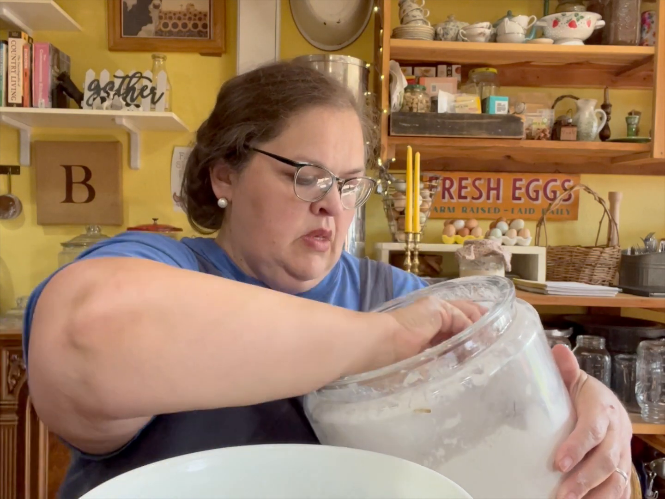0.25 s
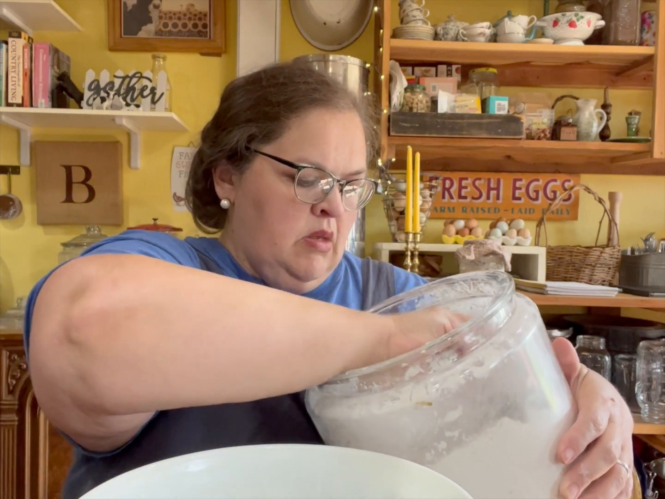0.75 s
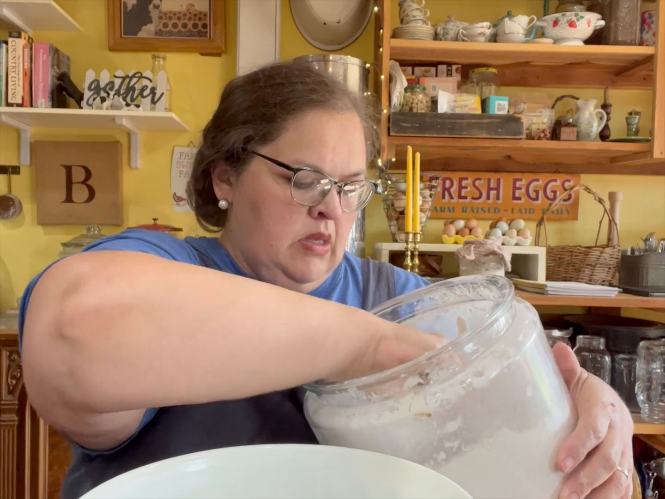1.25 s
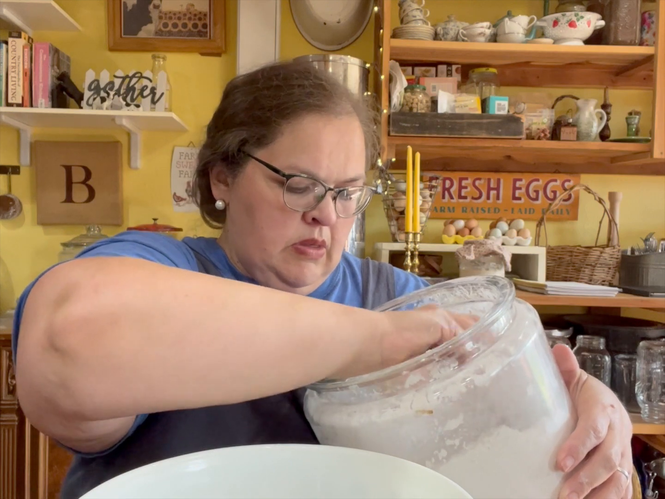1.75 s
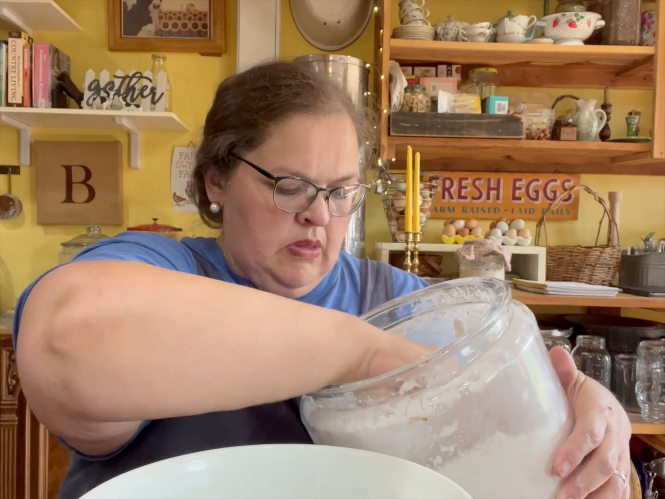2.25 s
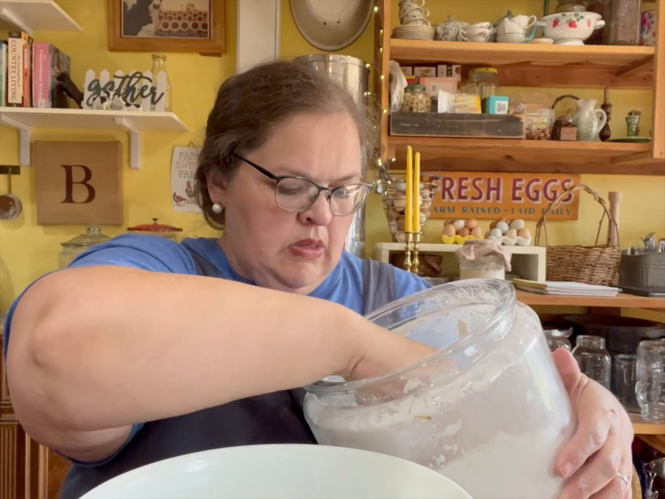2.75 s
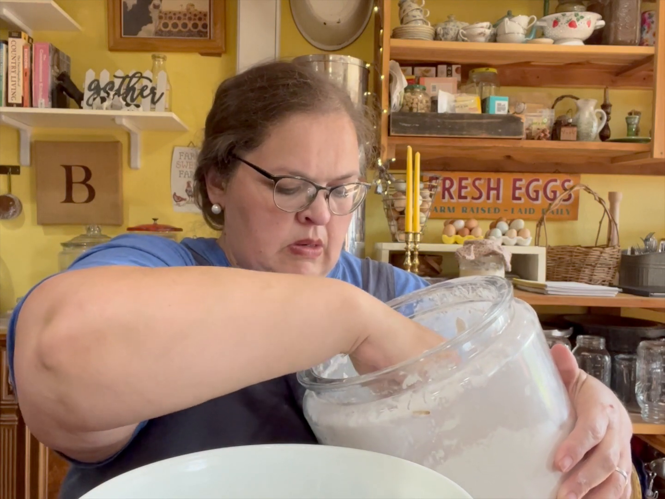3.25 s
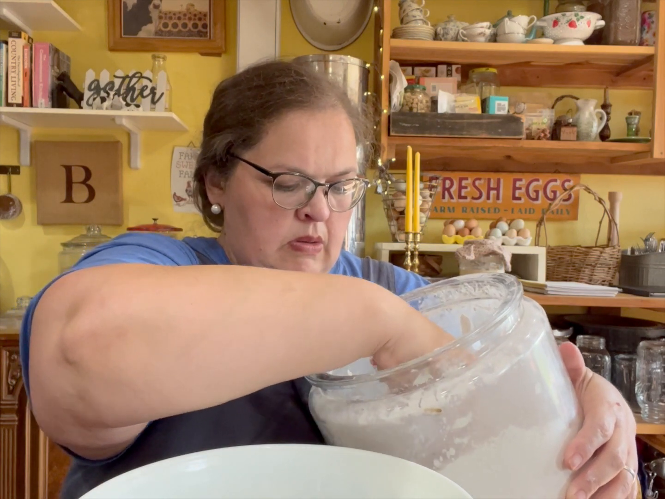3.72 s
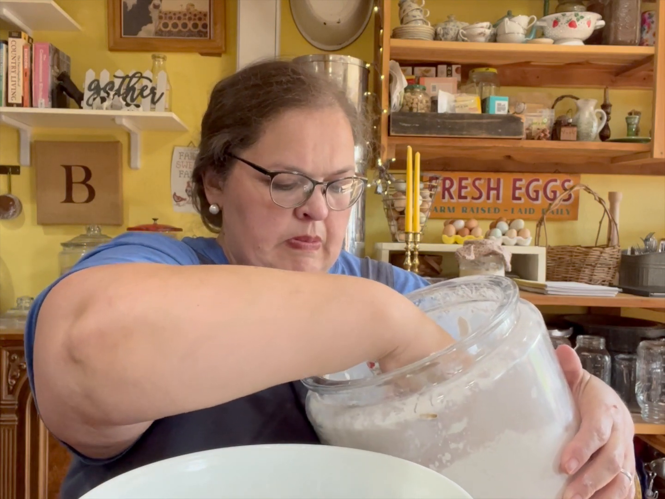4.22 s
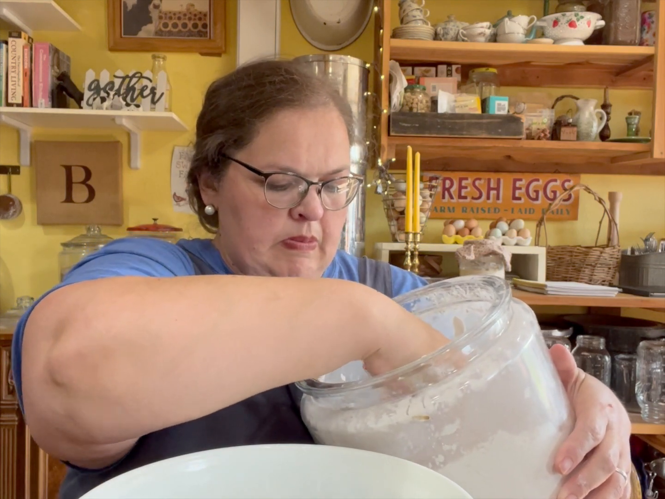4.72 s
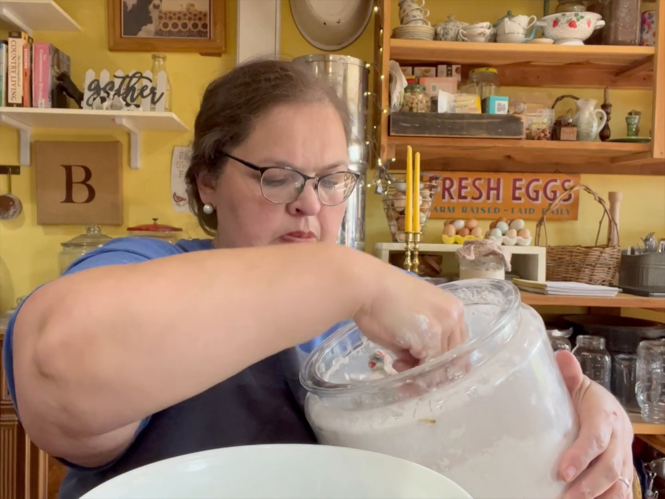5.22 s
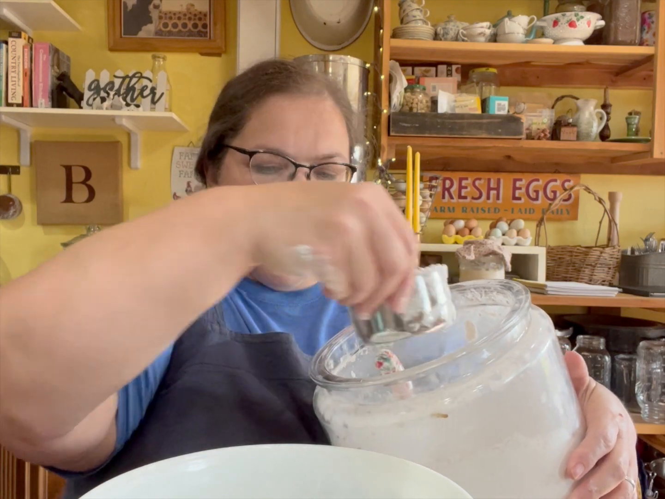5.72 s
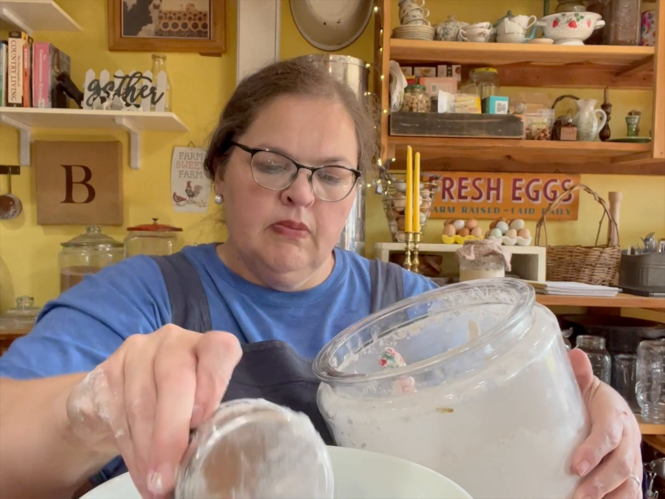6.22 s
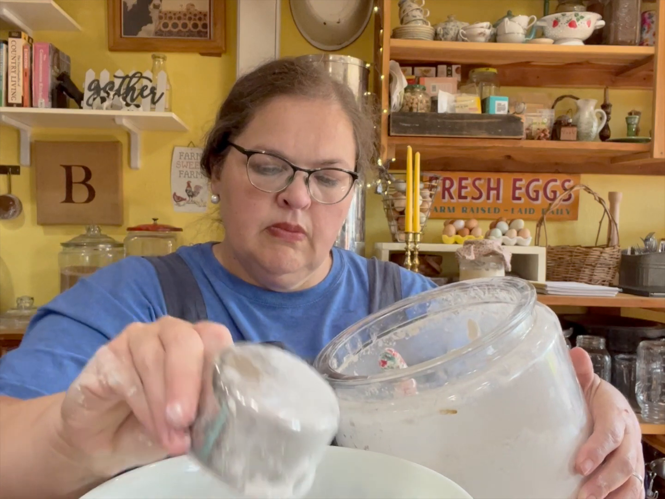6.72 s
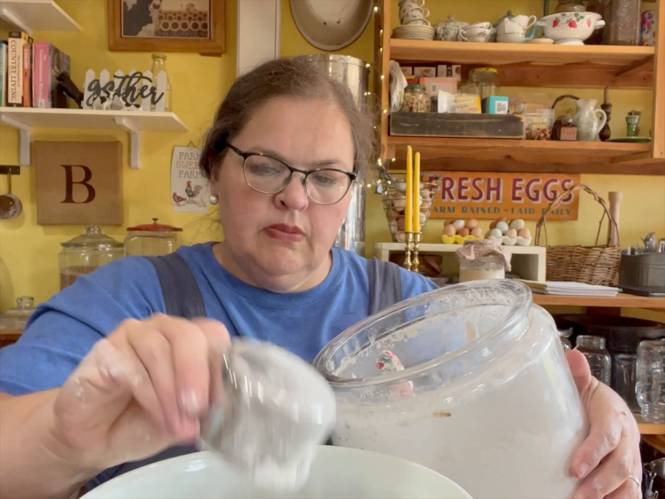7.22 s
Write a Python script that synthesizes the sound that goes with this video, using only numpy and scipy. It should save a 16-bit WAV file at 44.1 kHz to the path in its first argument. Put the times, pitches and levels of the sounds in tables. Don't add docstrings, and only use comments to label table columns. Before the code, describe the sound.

A small glass cup knocks and rings inside a big glass jar of flour, soft scrapes, then a load lands in a bowl over fridge hum.

```python
import sys
import numpy as np
from scipy import signal
from scipy.fft import rfft, irfft
from scipy.io import wavfile
from scipy.ndimage import uniform_filter1d

SR = 44100
rng = np.random.default_rng(int(sys.argv[2]) if len(sys.argv) > 2 else 0)


def bounce(signal):
    frames = np.transpose(np.atleast_2d(signal))
    limited = np.clip(frames, -1, 1)
    pcm = np.round(limited * 32767).astype(np.int16)
    wavfile.write(sys.argv[1], SR, pcm)


def invert_db(x):
    u = np.asarray(x, float) / 20
    return 10 ** u


N = 329427

# frequency [Hz], level [dB per Hz].
RUSH_SUM = [(28, -25), (45, -10), (85, -3.5), (155, -3.5), (240, -6), (350, -9.5), (550, -17), (900, -20),
            (1600, -26.5), (2600, -30), (4200, -38.5), (8000, -45.5), (10500, -53), (15000, -58.5)]
# frequency [Hz], level [dB per Hz].
RUSH_DIFFERENCE = [(28, -41), (45, -16.5), (85, -18), (155, -18.5), (240, -9.5), (350, -16.5), (550, -15),
                   (900, -17.5), (1600, -26), (2600, -29.5), (4200, -39), (8000, -44.5), (10500, -56),
                   (15000, -67)]
# peak [s], hiss [dB], dying time [s].
SLIDE_STROKES = [(.05, -79, 0.58), (.4, -78, 0.65), (.62, -73.5, 0.32), (.888, -68.5, 0.11),
                 (1.15, -72, 0.67), (1.52, -78, .5), (1.87, -72.5, 0.17), (2.04, -74.5, 0.19),
                 (2.185, -74, 0.15), (2.52, -75.5, 0.18), (2.73, -69.5, 0.077), (2.9, -74.5, 0.21),
                 (3.44, -79, .3), (4.2, -79, .6), (5.243, -74.5, .06), (5.52, -85, 0.98),
                 (5.865, -61.5, 0.071), (5.925, -61, .12), (6.1, -71.5, 0.092), (6.24, -64.5, 0.067),
                 (6.28, -61.5, 0.067), (6.308, -53.5, 0.043), (6.7, -80, 0.27), (7.07, -77, 0.12),
                 (7.24, -76.5, .25), (7.42, -76.5, .12)]
# frequency [Hz], level [dB per Hz].
SLIDE_COLOUR = [(2500, -18), (5000, -8.5), (7400, -8.5), (8500, 3.3), (9500, -5.5), (13000, -3),
                (15500, -8.5)]
# start [s], glass ring [dB], jar-air thud [dB], tick [dB], tick top [Hz].
RINGING_KNOCKS = [
    (0.130, -12, -24.5, -25, 1740),
    (0.632, -11.5, -25, -44, 1045),
    (1.0423, -0.5, -17.5, -14, 2380),
    (1.272, -23, -25.5, -22.5, 5100),
    (1.644, -29, -24, -29, 4440),
    (1.795, -9, -28.5, -33, 2080),
]
# start [s], jar-air thud [dB], tick [dB], tick top [Hz].
LIGHT_TAPS = [
    (0.88, -49, -38.5, 3970),
    (0.896, -45, -46, 3000),
    (2.722, -70, -49, 15660),
    (6.304, -66, -43.5, 13400),
    (6.614, -43, -37.5, 652),
]
# start [s], jar-air thud [dB].
DEEP_BUMPS = [
    (0.31, -40),
    (1.98, -31),
    (4.121, -33.5),
    (4.222, -35.5),
]
MODE_HZ = [566, 766, 802, 829, 884, 926, 1056, 1200, 1267, 1368, 1488, 1778, 1890, 2293, 2417, 2427, 2861,
           3384, 4612, 5006, 6092, 6444, 7736, 8110, 8480]
# level [dB], t60 [s], left minus right [dB].
MODE_RING = [(-34, 0.12, 8), (-33, 0.38, -11), (-30.5, 0.22, 16.5), (-25, 0.24, -15), (-44, 0.17, -10),
             (-42.5, 0.36, 3.5), (-31, 0.11, 8.5), (-40.5, 0.39, 1), (-30.5, 0.12, 18),
             (-36.5, 0.23, -24.5), (-62.5, 0.21, -19), (-41, 0.3, -13), (-42, 0.2, -4), (-39, 0.2, -13),
             (-27, 0.25, -1), (-40.5, 0.69, 3), (-35, 0.13, 12.5), (-44, 0.36, -5.5), (-49, 0.3, -14),
             (-55, 0.32, -14.5), (-36.5, 0.13, -9.5), (-67, 0.6, -22), (-49, 0.082, 3.5), (-50, .12, 0),
             (-48, 0.14, -15)]
# frequency [Hz], t60 [s].
ECHO_T60 = [(300, 0.2), (1500, 0.44), (4200, 0.47), (9000, 0.14)]
# frequency [Hz], echo level [dB].
ECHO_LEVEL = [(300, -26), (1000, 1), (2500, 2.5), (4500, 2.5), (7000, -25.5), (14000, -14.5)]
# peak [s], patter [dB], dying time [s].
FLOUR_FALLS = [
    (.895, -54.5, 0.13),
    (6.31, -52.5, 0.085),
    (6.5, -54, 0.15),
    (6.6, -60, 0.098),
]
# frequency [Hz], level [dB per Hz].
FALL_COLOUR = [(500, -7.5), (1200, -0.5), (1700, -1.5), (2500, -4.5), (3500, -15), (6000, -21),
               (9000, -21.5)]
# frequency [Hz], gain [dB].
SPACED_SUM = [(7000, -0.26), (9000, -6), (10000, -17.5), (12000, -12.5), (13300, -7.5), (14150, -2),
              (14700, -4), (15500, -0.7)]

STILL_DB = -90
BARE_FROM_DB = -3


def at_hz(points, hz):
    point_hz, value = np.array(points).T
    return np.interp(np.log(hz + 1), np.log(point_hz), value)


def left_right(mid, side):
    return np.array([mid + side, mid - side])


def coloured(spectrum):
    white = rfft(rng.standard_normal(N))
    return irfft(white * invert_db(at_hz(spectrum, np.fft.rfftfreq(N, 1 / SR))), N)


def house_rush():
    return invert_db(-24.5) * left_right(coloured(RUSH_SUM), coloured(RUSH_DIFFERENCE))


def drift(rate_hz):
    points_per_s = 40
    steps = rng.standard_normal(int(N / SR * points_per_s) + 2)
    r = np.exp(-2 * np.pi * rate_hz / points_per_s)
    slow = signal.lfilter([1], [1, -r], steps)
    return np.interp(np.arange(N) / SR * points_per_s, np.arange(len(slow)), slow / slow.std())


def fridge():
    motor_hz, motor_db, motor_pan_db, fade_in_s = 59.2, -51.5, 2.2, 0.17
    second_db, beat_s, loudest_s = -7.5, 4.65, 2.77
    whine_hz, whine_db, whine_pan_db, whine_lag_s = 268.68, -40.5, 5.5, .0001
    t, side = np.arange(N) / SR, np.array([[.5], [-.5]])
    second = invert_db(second_db) * np.exp(2j * np.pi * (t - loudest_s) / beat_s)
    beat = np.abs(1 + second) * np.minimum(t / fade_in_s, 1)
    motor_turn = 2 * np.pi * motor_hz * t + 0.25 * drift(1.0)
    motor = beat * invert_db(motor_db + motor_pan_db * side) * np.sin(motor_turn)
    whine_turn = 2 * np.pi * whine_hz * (t - whine_lag_s * side) + 0.15 * drift(0.98)
    whine = invert_db(whine_db + whine_pan_db * side + 0.92 * drift(2.7)) * np.sin(whine_turn)
    return np.sqrt(2) * (motor + whine)


def in_time(rows):
    rise_share, rest_db, dies_db = .6, -93, 20
    t, power = np.arange(N) / SR, invert_db(rest_db) ** 2
    for peak_s, peak_db, dying_s in rows:
        late = (t - peak_s) / dying_s
        away = np.clip(np.maximum(late, -late / rise_share), 0, 6)
        power = power + invert_db(peak_db - dies_db * away) ** 2
    return np.sqrt(power)


def flour(rows, spectrum, grit_db):
    hiss = left_right(coloured(spectrum), coloured(spectrum))
    clumps = uniform_filter1d(rng.standard_normal(N), size=44) * np.sqrt(44)
    return in_time(rows) * invert_db(grit_db * clumps) * hiss / hiss.std()


def sliding_flour():
    return invert_db(4.0) * flour(SLIDE_STROKES, SLIDE_COLOUR, grit_db=4.5)


def ring(clicks, hz, t60):
    r, w = invert_db(-60 / (t60 * SR)), 2 * np.pi * hz / SR
    return signal.lfilter([0, np.sin(w)], [1, -2 * r * np.cos(w), r * r], clicks + 1e-18)


def blows():
    taps = [(s, STILL_DB, *rest) for s, *rest in LIGHT_TAPS]
    bumps = [(s, STILL_DB, thud_db, STILL_DB, 900) for s, thud_db in DEEP_BUMPS]
    return sorted(RINGING_KNOCKS + taps + bumps)


def glass_ring(click):
    grip_db, grip_samples = 2.0, 500
    size = len(click)
    t, side = np.arange(size) / SR, np.array([[.5], [-.5]])
    chance = rng.standard_normal((len(MODE_RING), 2, size))
    grip = uniform_filter1d(chance, size=grip_samples) * np.sqrt(grip_samples)
    glass = 0
    for k, (hz, (level_db, t60, pan_db)) in enumerate(zip(MODE_HZ, MODE_RING)):
        mode = invert_db(level_db + pan_db * side) * ring(click, hz, t60) * invert_db(grip_db * grip[k])
        glass = glass + (-1) ** (k // 2) * mode
    return glass * (1 - np.exp(-t / 0.0008))


def jar_air(click):
    swell_s = 0.0013
    t = np.arange(len(click)) / SR
    swell = (t / swell_s) ** 2 * np.exp(2 - t / swell_s) / 4
    thud = swell * np.sin(2 * np.pi * 394 * t + 2.2)
    return thud + invert_db(-4.5) * ring(click, 387.6, 0.06)


def contact_tick(click, noise, top_hz):
    t = np.arange(len(click)) / SR
    band = signal.butter(2, [min(800, top_hz * .7), top_hz], "band", fs=SR, output="sos")
    noise = .8 * noise[0] + .6 * noise[1:]
    scuff = 1.5 * click + noise * (np.exp(-t / .004) + .13 * np.exp(-t / .03))
    rim = invert_db(-8.5) * ring(scuff, .87 * top_hz, 7 / top_hz)
    tick = signal.sosfilt(band, scuff + rim)
    return tick / tick[:, :SR // 100].std() / 3


def knocks():
    floured_hz, bare_hz = 960, 6900
    ring_leads, contact_leads = 4, 6
    size = SR // 2
    click = 1. * (np.arange(size) == 0)
    glass, air = glass_ring(click), jar_air(click)
    wall = invert_db(-8) * ring(click, 980, 0.035)
    events = blows()
    rung, contact = np.zeros((2, 2, N + size))
    grit = rng.standard_normal((len(events), 3, size))
    for (s, ring_db, thud_db, tick_db, top_hz), noise in zip(events, grit):
        bright_hz = bare_hz if ring_db > BARE_FROM_DB else floured_hz
        soft = signal.butter(3, bright_hz, fs=SR, output="sos")
        tick = wall * (ring_db < BARE_FROM_DB) + contact_tick(click, noise, top_hz)
        at = round(s * SR)
        rung[:, at:at + size] += invert_db(ring_db) * signal.sosfilt(soft, glass)
        contact[:, at:at + size] += invert_db(thud_db) * air + invert_db(tick_db) * tick
    rung[0] = np.roll(rung[0], ring_leads)
    contact[0] = np.roll(contact[0], contact_leads)
    return rung[:, :N], contact[:, :N]


def kitchen(x):
    size = SR // 2
    t, tail = np.arange(size) / SR, 0
    edges = 200 * 2 ** np.arange(0, 6.6, .5)
    white = rng.standard_normal((2, size))
    for low, high in zip(edges, edges[1:]):
        hz = np.sqrt(low * high)
        band = signal.sosfilt(signal.butter(2, [low, high], "band", fs=SR, output="sos"), white)
        tail = tail + band * invert_db(at_hz(ECHO_LEVEL, hz) - 60 * t / at_hz(ECHO_T60, hz))
    tail = tail * (t > .004) / np.sqrt(.03 * SR)
    return signal.fftconvolve(x.mean(axis=0)[None], tail, axes=1)[:, :N]


def falling_flour():
    return flour(FLOUR_FALLS, FALL_COLOUR, grit_db=-1.0)


def scene():
    background = house_rush() + fridge()
    slide = sliding_flour()
    glass, contact = knocks()
    echo = kitchen(contact + invert_db(-1) * glass)
    return background + slide + glass + contact + echo + falling_flour()


def roll_off(x):
    return signal.sosfilt(signal.butter(12, 16380, fs=SR, output="sos"), x)


def record(dry):
    hz = np.fft.rfftfreq(N, 1 / SR)
    mid, side = rfft(left_right(*dry) / 2) * (hz < 15780)
    mid = mid * invert_db(at_hz(SPACED_SUM, hz))
    pair = left_right(irfft(mid, N), irfft(side, N))
    return roll_off(pair)


dry = scene()
out = record(dry)
bounce(out)
```